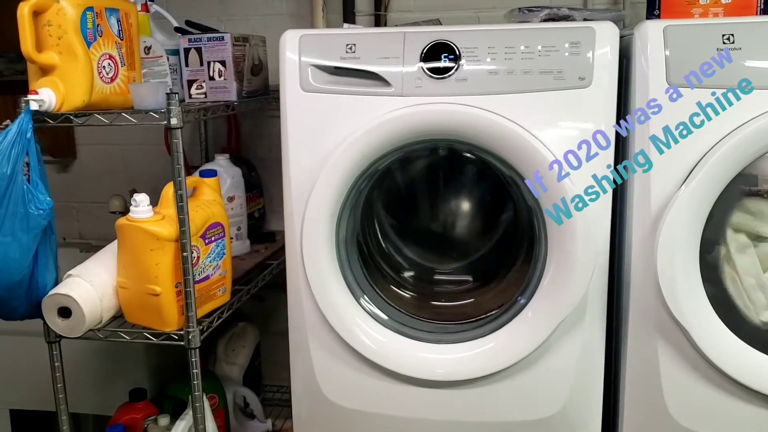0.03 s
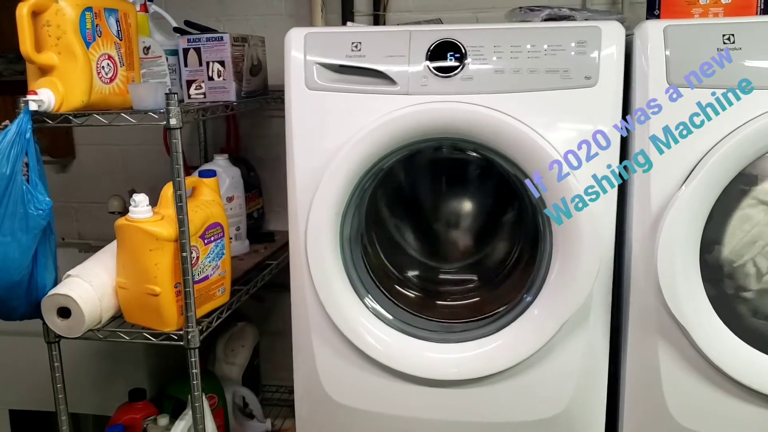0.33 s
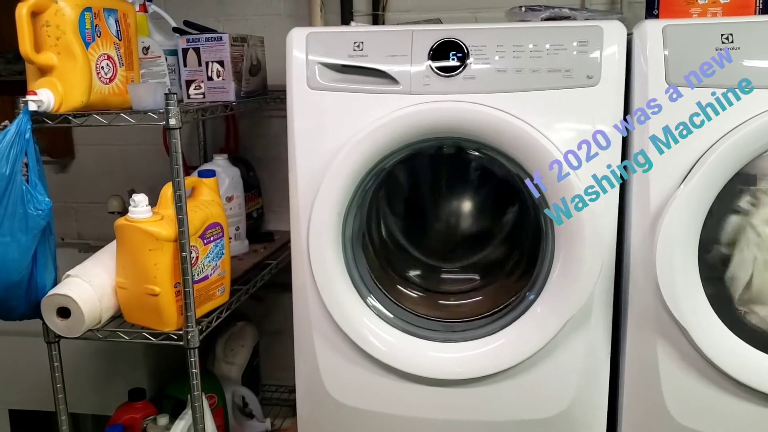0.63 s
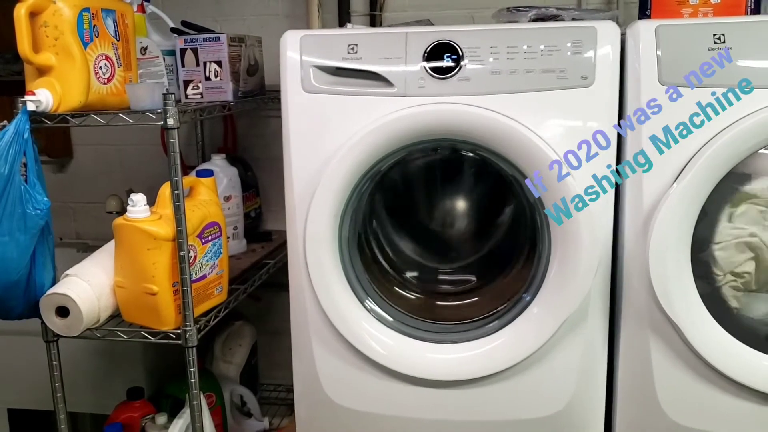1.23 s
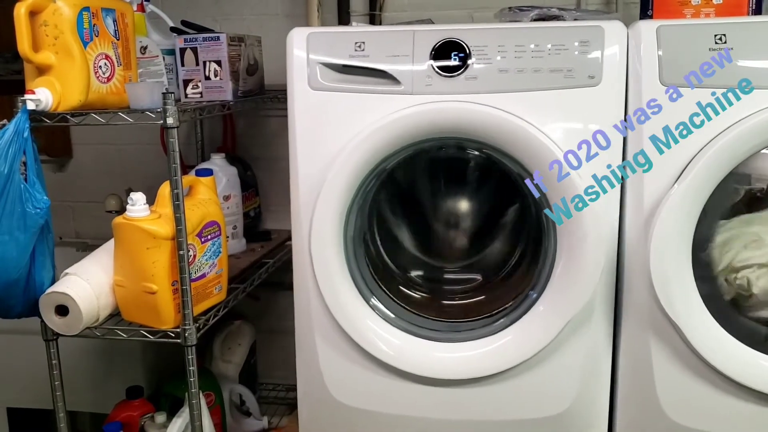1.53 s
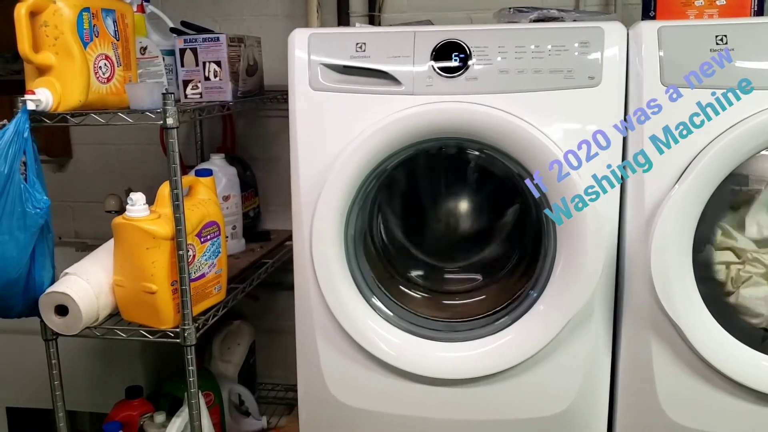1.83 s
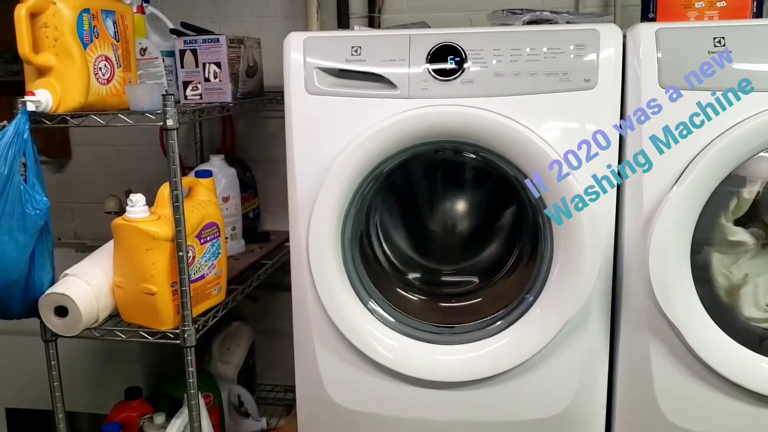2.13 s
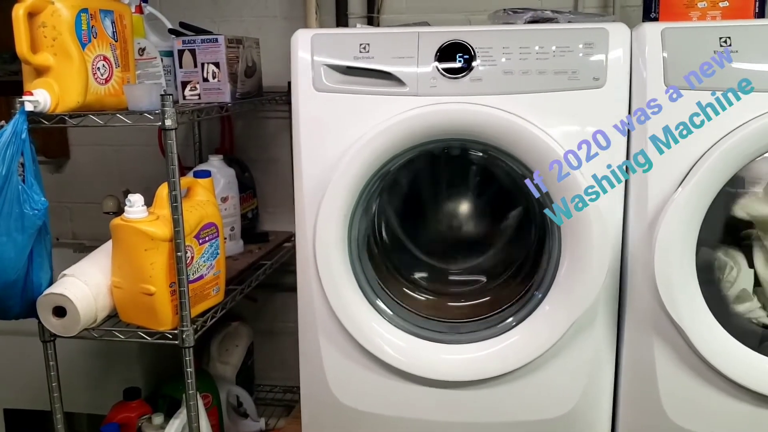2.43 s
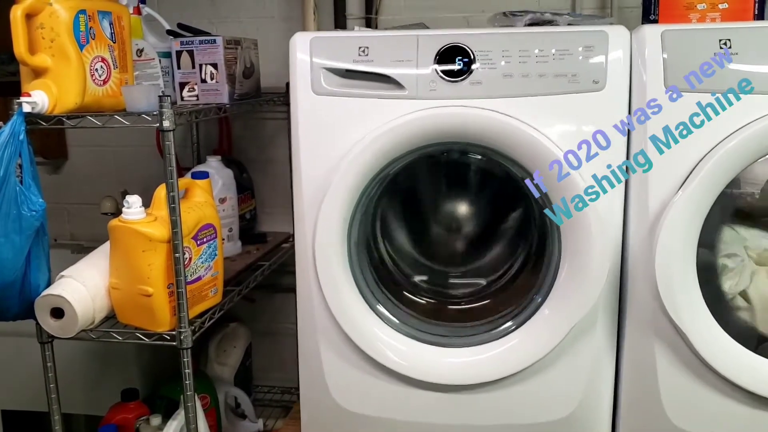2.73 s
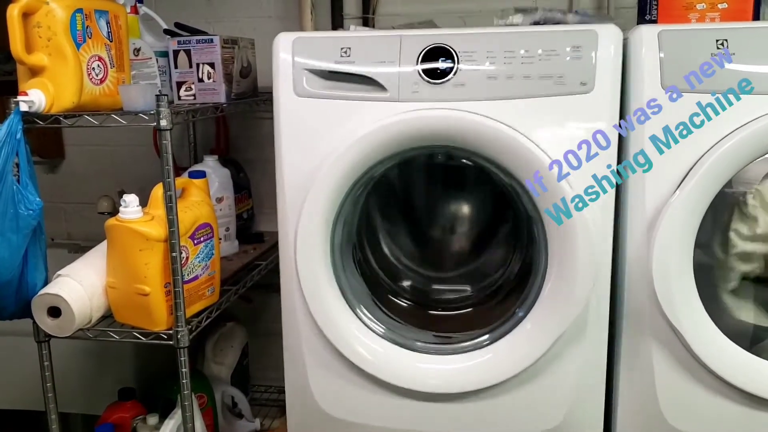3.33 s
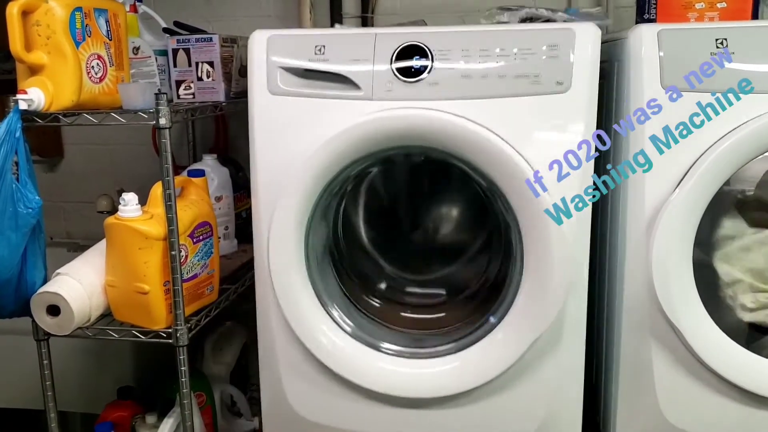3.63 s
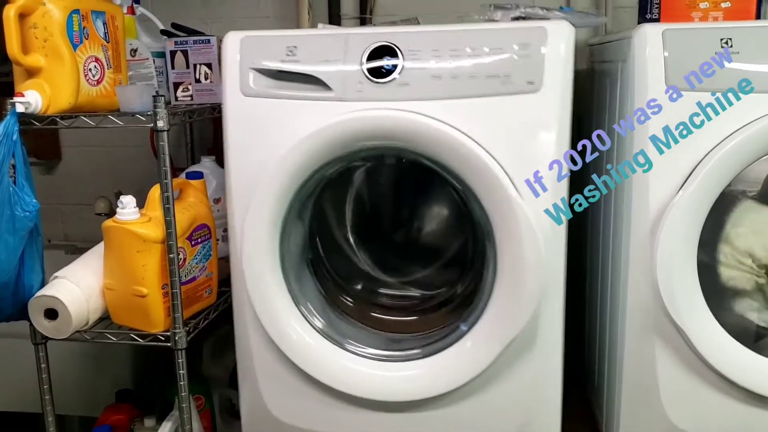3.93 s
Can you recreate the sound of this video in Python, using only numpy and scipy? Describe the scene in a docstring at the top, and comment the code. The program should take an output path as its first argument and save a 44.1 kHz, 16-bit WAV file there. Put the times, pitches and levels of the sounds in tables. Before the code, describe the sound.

A washing machine spins off balance, its motor humming under growing metallic thumps and bangs.

```python
"""An unbalanced washing machine spins up in a small laundry room with hard walls.
At first the motor hums and rumbles, and the tub brushes the cabinet once a turn with a soft swish.
From about 1.5 s the tub knocks against it, ever faster, and the sheet-steel panels ring.
From about 3 s the whole cabinet rocks and bangs: its frame booms against the floor,
the drum knocks hollowly and loose parts rattle louder."""
import sys
import numpy as np
from scipy import signal
from scipy.fft import rfft, irfft
from scipy.io import wavfile

SR = 44100
rng = np.random.default_rng(int(sys.argv[2]) if len(sys.argv) > 2 else 0)


def transcribe(u):
    """Save the signal u as a 16-bit wav file named by the first command-line argument.

    u: samples, shape (n,) or (channels, n), limited to [-1, 1]; the rate is SR.
    q: integer samples, one column per channel.
    """
    v = np.clip(np.atleast_2d(u).T, -1, 1)
    q = np.round(v * 32767).astype(np.int16)
    wavfile.write(sys.argv[1], SR, q)


N = 176400
TIME = np.arange(N) / SR
ROCKING_FROM_S = 2.85

# Levels are relative. A TONE table says how strong a sound is from bass to treble.
# blows on the cabinet: (time [s], body note [dB], panel ring [dB], clang [dB])
THUDS = [(0.596, -46, -39, -45), (1.463, -24.5, -25.5, -25), (1.682, -20.5, -22, -25),
         (1.916, -24, -21.5, -27), (2.147, -23, -23, -29), (2.19, -37, -31, -29.5),
         (2.358, -22, -20.5, -39), (2.541, -21, -20.5, -23), (2.623, -47, -39, -28.5),
         (2.707, -18, -21, -23.5), (2.78, -26, -31, -27), (2.885, -18, -25, -24), (3.001, -19, -20.5, -21),
         (3.052, -27, -30, -25.5), (3.16, -20, -16.5, -18.5), (3.184, -19, -32, -23),
         (3.314, -12.5, -16.5, -19), (3.366, -25, -23, -40), (3.424, -17.5, -34, -24),
         (3.457, -14, -34, -25), (3.512, -28, -19.5, -20.5), (3.578, -28, -30, -19),
         (3.587, -18, -9.5, -18), (3.66, -16, -15.5, -21), (3.718, -35, -31, -15), (3.749, -24, -19, -31),
         (3.845, -23, -18.5, -15), (3.865, -21, -19, -20), (3.931, -17.5, -24, -39),
         (3.978, -19.5, -28, -21.5)]
# notes the frame and panels ring at: (pitch [Hz], level [dB], time to fade by 60 dB [s])
CABINET_NOTES = [(82, -15, 0.32), (140, -3.5, 0.1), (175.6, -1, 0.3), (212, -17, 0.093), (249.2, -12, 0.34),
                 (315, -8, 0.27), (392.4, -10.5, 0.14), (475.3, -22.5, 0.27), (544.3, -13, 0.24),
                 (595, -11, 0.16)]
# deep ring and brighter clang of steel and room: (frequency [Hz], level [dB])
PANEL_TONE = [(60, 9), (110, -3.5), (170, -10), (250, 2), (330, -5), (450, -31), (800, -44), (2000, -37)]
CLANG_TONE = [(150, -3), (330, -7.5), (520, -5.5), (800, -9), (1100, -17.5), (1600, -22.5), (3000, -27),
              (8000, -42)]
# the frame hits the floor; hard swings knock on the drum: (time [s], level [dB], pitch [Hz])
FRAME_BOOMS = [(.609, -25, 71.5), (.665, -27, 68.6), (.885, -27, 69.5), (1.278, -37, 69),
               (1.463, -20.5, 77), (1.623, -21.5, 65.5), (1.68, -37, 80), (1.911, -28, 77),
               (2.166, -26, 67), (2.354, -31, 77.4), (2.62, -25, 77), (2.654, -21.5, 73), (2.704, -32, 87),
               (2.777, -21, 66.4), (2.818, -24, 75), (2.877, -16, 85), (3.002, -11, 102.4), (3.04, -12, 85),
               (3.106, -23, 81.5), (3.155, -11, 95), (3.193, -16, 90.5), (3.315, -7.5, 83.5),
               (3.354, -15.5, 77.5), (3.438, -13, 96), (3.466, -9.5, 72), (3.505, -19, 62),
               (3.582, -14.5, 158), (3.587, -9.5, 92.5), (3.648, -14, 86), (3.715, -14.5, 86),
               (3.752, -8, 89), (3.866, -10.5, 88), (3.916, -18.5, 89)]
DRUM_KNOCKS = [(3.312, -25.5, 846), (3.573, -24, 795), (3.584, -14.5, 523), (3.853, -25.5, 540)]
# hard hits of tub, trim and door: (time [s], clack [dB], rattle [dB])
KNOCKS = [(1.453, -31, -38.5), (1.671, -28, -36), (1.906, -27.5, -37), (2.053, -29, -74),
          (2.136, -26.5, -37.5), (2.344, -26.5, -39), (2.425, -42, -46), (2.529, -28, -36.5),
          (2.61, -39, -42), (2.699, -31.5, -34), (2.873, -29, -33.5), (2.956, -27.5, -33),
          (3.025, -26, -36), (3.11, -28, -39), (3.153, -25.5, -40), (3.2, -29.5, -37), (3.281, -24, -31),
          (3.313, -21.5, -31), (3.385, -46, -30.5), (3.433, -24, -26.5), (3.454, -26.5, -26.5),
          (3.509, -40, -31), (3.578, -22.5, -34), (3.601, -24.5, -20), (3.625, -24.5, -27),
          (3.665, -27.5, -31), (3.716, -26.5, -35), (3.739, -27.5, -31.5), (3.776, -48, -25),
          (3.852, -26, -38), (3.873, -24, -23.5), (3.9, -25.5, -27.5), (3.97, -25.5, -28.5)]
# the three parts of a knock: (frequency [Hz], level [dB])
CRACK_TONE = [(1000, 0), (2000, 3), (3000, -1), (5700, 2), (7500, -9), (11000, 0.5), (14500, -3)]
CLACK_TONE = [(200, -34), (600, 8.5), (1000, 5.5), (1500, 1), (1900, 2.5), (2800, 3.5), (3400, -5.5),
              (5700, -4), (7500, -32), (15000, -17)]
RATTLE_TONE = [(1000, -14), (3000, 2.5), (5700, 3), (7400, -2), (9000, 2), (12000, 5), (14500, -6)]
# loose parts shaking: (time [s], level [dB]) and (frequency [Hz], level [dB])
CHATTER_LEVEL = [(0, -47.5), (.4, -46), (.6, -44), (1.3, -43.5), (1.8, -46.5), (2.3, -43.5), (2.85, -38.5),
                 (3.05, -32), (3.25, -34.5), (3.45, -28), (4, -31)]
CHATTER_TONE = [(300, 5), (900, -1), (1600, -2), (2700, -7), (3500, -10.5), (5700, -6), (7400, -19.5),
                (10000, -13), (12500, -9), (15000, -39)]
# metal rubs on metal: (time [s], length [s], pitch [Hz], level [dB])
SQUEAKS = [(2.21, .09, 475, -39), (2.33, 0.1, 491, -36), (3.37, 0.02, 12600, -39),
           (3.416, .028, 12400, -40), (3.964, 0.026, 807, -25.5), (3.966, 0.036, 1980, -28.5)]
# the tub brushes past: (time [s], level [dB]) and (frequency [Hz], level [dB])
BRUSHES = [(.18, -40), (0.434, -36.5), (.70, -35.5), (0.929, -35), (1.16, -38), (1.41, -34.5)]
BRUSH_TONE = [(150, -10), (300, 0), (800, -4.5), (1500, -6.5), (2800, -11.5), (5500, -19.5), (8000, -29),
              (15000, -32)]
# faint early rustles: (time [s], level [dB])
RUSTLES = [(.01, -48), (.195, -47), (.52, -46), (.77, -49), (.92, -45), (1.015, -51), (1.24, -49),
           (1.28, -46)]
# rumble of motor and drum: (time [s], level [dB]) and (frequency [Hz], level [dB])
RUMBLE_LEVEL = [(0, -35.5), (.52, -36.5), (.62, -32), (.95, -33), (1.3, -33), (2, -32), (2.5, -30.5),
                (3, -28.5), (3.5, -26.5), (4, -26)]
RUMBLE_TONE = [(15, -38), (26, -22), (37, -25), (52, -2), (70, -2), (90, -3.5), (140, -10.5), (200, -15.5),
               (250, -8), (295, -16), (375, -17), (440, -19), (780, -22.5), (1200, -29.5), (3000, -34.5),
               (8000, -48.5)]
# the motor's hum: (pitch [Hz], level against the rumble [dB])
HUM_NOTES = [(59.5, -6), (120, -11.5), (179, -12), (239, -19.5), (382, -21), (797, -25.5)]
# how long steel and room ring: (frequency [Hz], time to fade by 60 dB [s])
RING_TIMES = [(60, 0.15), (250, 0.42), (800, 0.32), (2500, 0.33), (6000, 0.24), (14000, 0.19)]
# spread between the ears: (frequency [Hz], width [dB], right over left [dB])
STEREO = [(60, -23, -1.6), (125, -17.5, 1), (250, -17, -0.5), (500, -11, -1.3), (1010, -6.5, -2),
          (1790, 0, 0), (4170, -0.5, 5.5), (7860, 0.5, 10.5), (10800, 11, 17), (13600, -29, 3)]


def thuds(body_hz=219.7, clang_above_hz=400, notes_db=-4, spread_db=1.5):
    """Each blow on the cabinet sounds a short body note, ringing panel notes and a wash of steel."""
    times, body_db, panel_db, clang_db = np.transpose(THUDS)
    pitches = body_hz * (1 + 0.032 * rng.standard_normal(len(times)))
    out = short_notes(zip(times, body_db, pitches), rise_s=0.0045, shape=1.05)
    for hz, db, fade_s in CABINET_NOTES:
        blow_db = panel_db if hz < clang_above_hz else clang_db
        chance_db = spread_db * rng.standard_normal(len(times))
        clicks = np.zeros(N)
        clicks[(times * SR).astype(int)] = -from_db(blow_db + db + notes_db + chance_db)
        # this filter turns each click into a fading note
        decay = np.exp(-np.log(1000) / (fade_s * SR))
        step = 2 * np.pi * hz / SR
        out += signal.lfilter([0, np.sin(step)], [1, -2 * decay * np.cos(step), decay ** 2], clicks + 1e-18)
    hits = bounces(times, panel_db + 27, bounce_s=0.008, bounce_db=-7.5)
    panels = ring(hits, PANEL_TONE, early_db=-15.5, early_s=0.0026)
    hits = bounces(times, clang_db + 27, bounce_s=0.008, bounce_db=-13)
    clang = ring(hits, CLANG_TONE, early_db=-3.5, early_s=0.0054)
    return out + panels + clang


def booms(lowest_hz=38):
    """The frame booms deeply against the floor, and the hardest swings knock hollowly on the drum."""
    frame = short_notes(FRAME_BOOMS, rise_s=0.0096, shape=1.61)
    drum = short_notes(DRUM_KNOCKS, rise_s=0.0076, shape=2.8)
    low_cut = signal.butter(4, lowest_hz, "high", fs=SR, output="sos")
    return signal.sosfilt(low_cut, frame) + drum


def knocks(spots=5):
    """Hard hits land on a few spots in turn; each clacks and sets off a short, bright rattle."""
    out = 0
    for spot in range(spots):
        times, clack_db, rattle_db = np.transpose(KNOCKS[spot::spots])
        hits = bounces(times, clack_db + 30.5, bounce_s=0.0075, bounce_db=-7)
        out += ring(hits, CLACK_TONE, early_db=-9, early_s=0.046)
        hits = bounces(times, rattle_db + 27.5, bounce_s=0.004, bounce_db=-5)
        out += ring(hits, RATTLE_TONE, early_db=3, early_s=0.026)
    return out


def cracks(soften_db_per_s=10):
    """Each knock opens with a tiny crack, which softens against its rattle once the cabinet rocks."""
    rows = [(s, rattle_db + 7 - soften_db_per_s * time_rocking(s)) for s, _, rattle_db in KNOCKS]
    grain = from_db(0.5 * drift(760))
    return swells(rows, rise_s=0.004, fall_s=0.0035) * grain * noise(CRACK_TONE)


def chatter(parts=3, ticks_per_s=550):
    """A few loose parts tick at random, in small flurries, louder as the shaking grows."""
    out = 0
    for _ in range(parts):
        ticks = (rng.random(N) < ticks_per_s / parts / SR) * rng.choice([-1, 1], N)
        size_db = 4 * np.minimum(rng.exponential(1, N), 4)
        flurry_db = 2 * drift(1.7)
        clicks = normalize(ticks * from_db(size_db + flurry_db)) * level(CHATTER_LEVEL)
        out += ring(clicks, CHATTER_TONE, early_db=-8.5, early_s=0.0053)
    return out / np.sqrt(parts)


def squeaks(waver_hz=40):
    """Steel rubs on steel in brief, unsteady squeals."""
    out = 0
    for start, length, hz, db in SQUEAKS:
        progress = np.clip((TIME - start) / length, 0, 1)
        loudness = 2 * from_db(db) * np.sqrt(np.abs(np.sin(np.pi * progress)))
        out += stereo(loudness * sine(hz + waver_hz * drift(105.6)), 0, hz)
    return out


def brushes():
    """The tub rubs the seal once a turn: a grainy swish that swells and fades."""
    grain = from_db(0.5 * drift(120))
    return swells(BRUSHES, rise_s=0.019, fall_s=0.068) * grain * noise(BRUSH_TONE)


def rustles():
    """Short, grainy, bright rustles while the shaking is still gentle."""
    grain = from_db(2 * drift(300))
    return swells(RUSTLES, rise_s=0.017, fall_s=0.027) * grain * noise(RATTLE_TONE)


def motor(waver_db=0.5, waver_hz=1.245):
    """The motor's wavering hum and the drum's rumble grow louder together."""
    hum = 0
    for hz, db in HUM_NOTES:
        loudness = np.sqrt(2) * from_db(db - waver_db * drift(3.3))
        hum += loudness * sine(hz + waver_hz * drift(4.7))
    return level(RUMBLE_LEVEL) * (hum + noise(RUMBLE_TONE))


def ring(clicks, tone, early_db, early_s):
    """Clicks make steel and room ring: a quick early burst and a tail that dies band by band."""
    t = TIME[:SR // 2]
    edges_hz = 45 * 2 ** np.arange(0, 8.7, 1 / 3)  # three bands to an octave
    hiss = rng.standard_normal((2, 2, len(t)))
    echo = 0
    for k, (low, high) in enumerate(zip(edges_hz, edges_hz[1:])):
        hz = np.sqrt(low * high)
        early = from_db(early_db) * np.exp(-t / early_s)
        tail = np.exp(-np.log(1000) * t / at_hz(RING_TIMES, hz))
        band_filter = signal.butter(2, [low, high], "band", fs=SR, output="sos")
        middle, side = signal.sosfilt(band_filter, hiss[k % 2] * (early + tail))
        band = stereo(normalize(middle), normalize(side), hz)
        echo += band * from_db(at_hz(tone, hz)) * np.sqrt(high - low)
    return signal.fftconvolve(clicks[None], normalize(echo) / np.sqrt(len(t)), axes=1)[:, :N]


def bounces(times, levels_db, bounce_s, bounce_db, count=24):
    """Each hit is one click and a dying run of small bounces, longer once the cabinet rocks."""
    out = np.zeros(N + SR)
    for start, db in zip(times, levels_db):
        delays = np.append(0, (np.arange(count) + rng.random(count)) / count * 3)
        stretch_s = bounce_s * (1 + 1.2 * time_rocking(start))
        sizes = np.append(1, from_db(bounce_db) * rng.standard_normal(count)) * np.exp(-delays / 2)
        samples = ((start + delays * stretch_s) * SR).astype(int)
        np.add.at(out, samples, from_db(db) * sizes / np.linalg.norm(sizes))
    return out[:N]


def short_notes(rows, rise_s, shape):
    """Notes that peak after rise_s and die away; a larger shape makes them shorter."""
    out, t = np.zeros(N + SR), TIME[:SR // 4]
    loudness = (t / rise_s * np.exp(1 - t / rise_s)) ** shape
    for s, db, hz in rows:
        start = int(s * SR)
        out[start:start + len(t)] -= from_db(db) * np.sqrt(2) * loudness * np.sin(2 * np.pi * hz * t)
    return out[:N]


def swells(rows, rise_s, fall_s):
    """Loudness that rises evenly and dies away for each (time [s], level [dB]) row."""
    out = 0
    for start, db in rows:
        rise = np.clip((TIME - start) / rise_s, 0, 1)
        fall = np.exp(-np.maximum(TIME - start - rise_s, 0) / fall_s)
        out += from_db(db) * rise * fall
    return out


def noise(tone):
    """Steady stereo noise shaped by a tone table."""
    hz = np.arange(N // 2 + 1) * SR / N
    middle, side = rfft(rng.standard_normal((2, N)))
    return normalize(irfft(stereo(middle, side, hz) * from_db(at_hz(tone, hz)), N))


def stereo(middle, side, hz):
    """Left and right: alike in the bass, louder on the right in the treble."""
    width = from_db(at_hz(STEREO, hz))
    lean = from_db(at_hz(STEREO, hz, column=2))
    left, right = middle + width * side, (middle - width * side) * lean
    return np.array([left, right]) / np.sqrt((1 + width ** 2) * (1 + lean ** 2))


def drift(rate_hz):
    """A random wander of about 1 either way; a higher rate wanders faster."""
    hz = np.arange(N // 2 + 1) * SR / N
    return normalize(irfft(rfft(rng.standard_normal(N)) / (1 + (hz / rate_hz) ** 2), N))


def time_rocking(s):
    """Seconds the cabinet has been rocking by time s."""
    return max(s - ROCKING_FROM_S, 0)


def sine(hz):
    """A pure note that follows a changing pitch."""
    return np.sin(2 * np.pi * np.cumsum(hz) / SR)


def level(curve):
    """Loudness gliding through (time [s], level [dB]) points."""
    return from_db(np.interp(TIME, *np.transpose(curve)))


def at_hz(table, hz, column=1):
    """Look up a frequency in a table, gliding between rows by octaves."""
    rows = np.array(table)
    return np.interp(np.log(np.maximum(hz, 1)), np.log(rows[:, 0]), rows[:, column])


def normalize(x):
    """Scale a signal to an average power of 1."""
    return x / np.sqrt(np.mean(x ** 2) + 1e-20)


def from_db(db):
    """Turn decibels into a multiplier."""
    return 10 ** (np.asarray(db) / 20)


def scene(left_delay_s=0.0001):
    """All the machine's sounds together; they reach the left ear slightly later."""
    background = motor() + brushes() + rustles()
    banging = cracks() + knocks() + booms() + thuds()
    left, right = background + banging + chatter() + squeaks()
    late_left = np.pad(left, (int(left_delay_s * SR), 0))[:N]
    return np.array([late_left, right])


def record(dry, top_hz=14750):
    """Flatten any peaks past full level, then cut the highest treble steeply."""
    treble_cut = signal.ellip(12, 0.2, 90, top_hz, fs=SR, output="sos")
    return signal.sosfilt(treble_cut, np.clip(dry, -1, 1))


dry = scene()
out = record(dry)
transcribe(out)
```